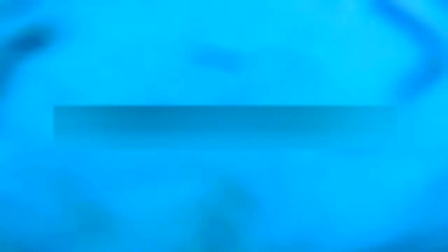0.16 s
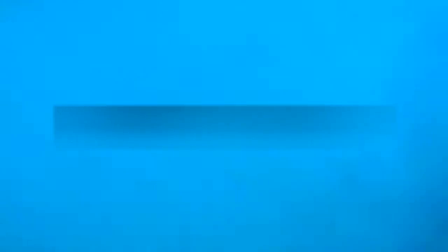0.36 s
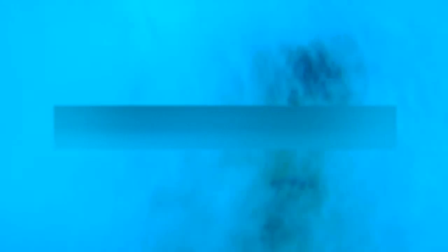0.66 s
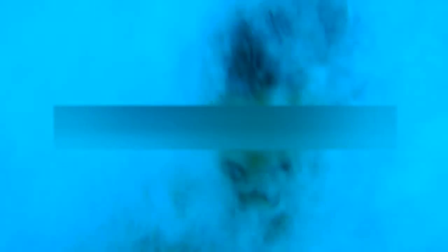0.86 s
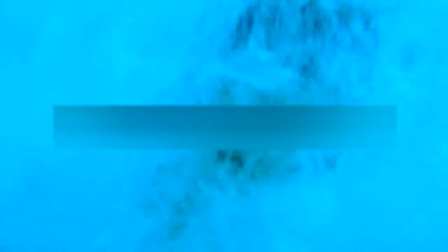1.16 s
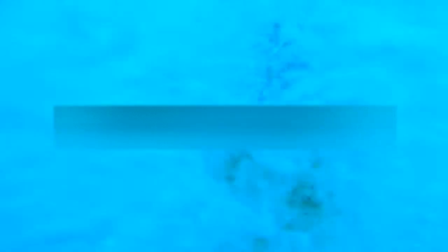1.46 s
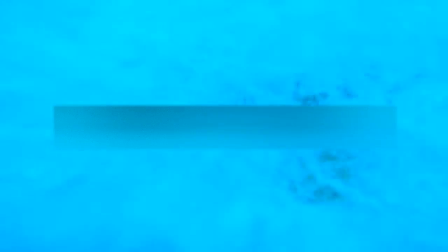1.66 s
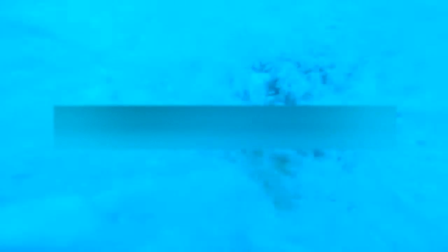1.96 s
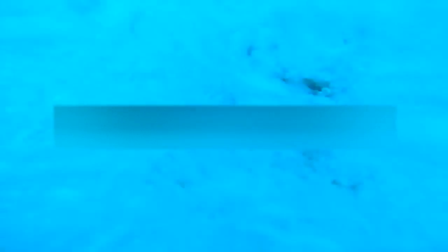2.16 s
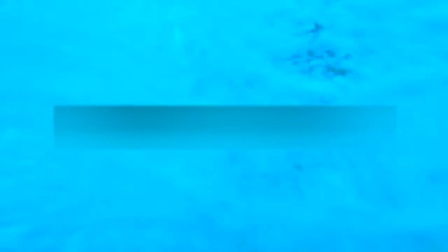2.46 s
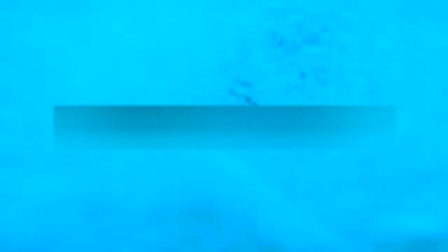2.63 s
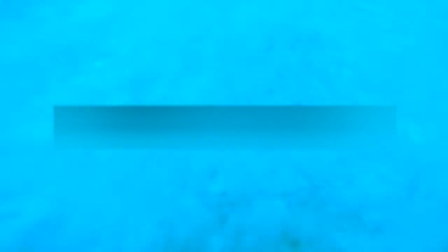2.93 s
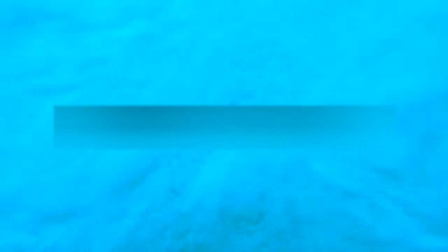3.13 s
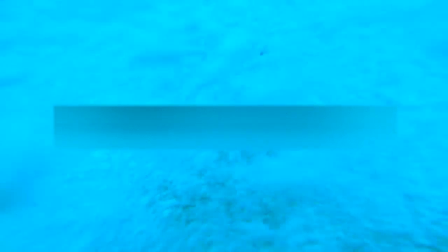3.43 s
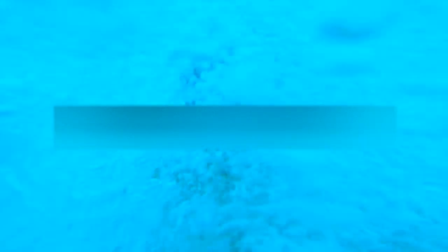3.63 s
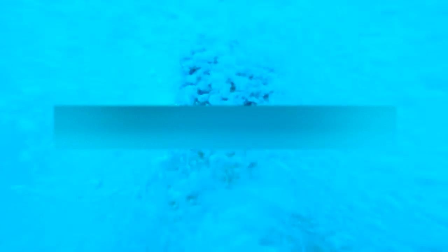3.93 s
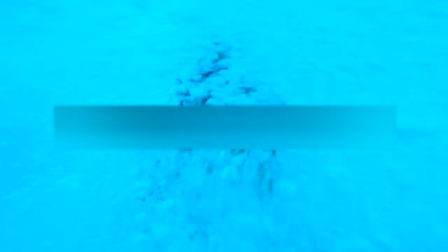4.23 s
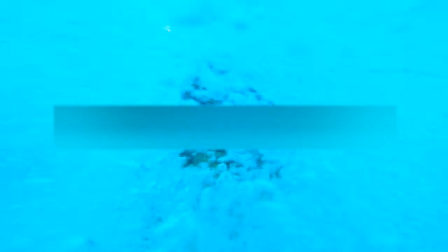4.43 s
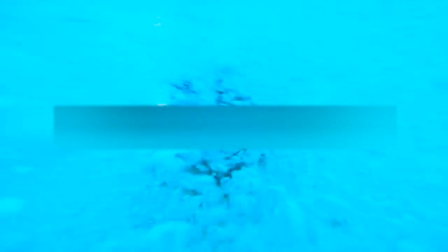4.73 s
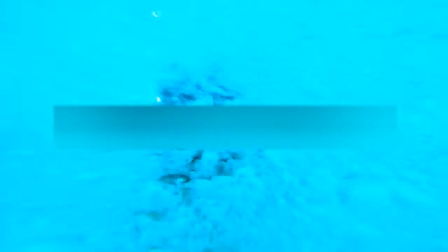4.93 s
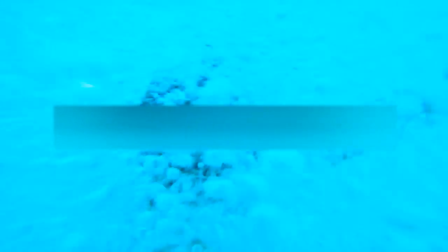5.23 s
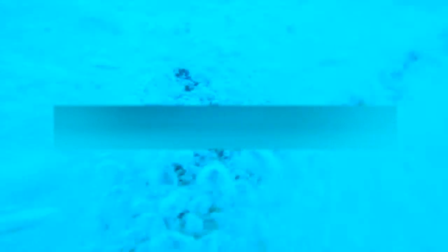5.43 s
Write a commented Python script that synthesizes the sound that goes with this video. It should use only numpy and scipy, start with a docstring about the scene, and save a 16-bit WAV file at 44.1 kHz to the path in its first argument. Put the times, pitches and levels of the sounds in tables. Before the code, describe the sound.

A rush of water and a burst of bubbles start at once, heard underwater from a camera in a sealed housing plunging into a pool. For the first second, dense gurgling mixes with fizz, sharp wet pops and tiny high plinks, with a light knock on the housing near 1 second. The fizz then thins, leaving rounded glugs over a low, buffeting rumble, with a strong shove of water near 2 seconds. From about 2.4 to 3 seconds, another knock opens a second bright flurry of pops and fizz. Trapped air gives one low, wavering hoot from roughly 2.7 to 3.2 seconds. Scattered pops and glugs follow, and the gurgling drops away around 4 seconds. The deep, muffled rush carries on with a few faint glugs until the end at about 5.6 seconds. The bubbles stay close and centred, while the water spreads slightly wider.

```python
"""A rush of water and a burst of bubbles: a camera in a sealed housing plunges into a pool.
Turbulence buffets the housing as it tumbles through the bubble cloud. Each bubble rings at a pitch
set by its size: large ones gurgle, small ones fizz and pop against the shell, and a few hard bursts
knock it. A trapped air pocket hoots once. When the cloud has passed, the muffled rush is left,
with a stray glug or two."""
import sys
import numpy as np
from scipy import signal
from scipy.fft import rfft, irfft, next_fast_len
from scipy.io import wavfile
from scipy.ndimage import uniform_filter1d

SR = 44100
rng = np.random.default_rng(int(sys.argv[2]) if len(sys.argv) > 2 else 0)


def master(y):
    """Save y as 16-bit WAV."""
    cut = np.clip(np.atleast_2d(y).T, -1, 1)
    pcm = np.round(cut * 32767)  # scale
    wavfile.write(sys.argv[1], SR, pcm.astype(np.int16))


N = 246519


def cloud():
    """Countless bubbles in three sizes; near ones come in clumps and stand out of the far blur."""
    # arc of the cloud: t/s, gurgle level/dB, fizz level/dB, spray level/dB, near share of power/0-1
    cloud_arc = [(0, -26.5, -29.5, -41.5, .8), (.08, -28, -25, -40, 0.68), (.19, -20, -21.5, -42.5, 0.9),
                 (.26, -17.5, -20.5, -59, 0.22), (.36, -20, -28, -55.5, 0.72),
                 (.5, -17.5, -25, -51.5, 0.46), (.61, -17.5, -27, -66, 0.12), (.78, -18, -34, -75, 0.03),
                 (.9, -24, -35, -56.5, 0.28), (.97, -20, -41, -72, 0), (1.1, -27, -47.5, -69, 0.67),
                 (1.46, -24.5, -53, -71, 0.36), (1.75, -24.5, -53, -69.5, .3),
                 (2.1, -23.5, -54.5, -67.5, 0.35), (2.38, -28, -51.5, -66, .4), (2.48, -21, -43, -64, 0.7),
                 (2.57, -25, -30.5, -44.5, 1), (2.61, -25, -24, -42, 0.99), (2.75, -24, -24, -41, 1),
                 (2.81, -27.5, -38.5, -57, 1), (2.93, -30, -35.5, -71, .7), (3.04, -30.5, -53.5, -75.5, .6),
                 (3.35, -30.5, -59, -76, 0.8), (3.88, -30.5, -60, -79, .6),
                 (3.97, -42.5, -56.5, -83.5, .75), (4.16, -51.5, -75, -80.5, 0.96),
                 (4.26, -51.5, -87, -99, 0.48), (5.45, -52.5, -90, -100, 0.51), (5.59, -46, -52, -99, 0.05)]
    # tone colours, each: f/Hz, relative level/dB
    gurgle_tone = [(250, 2.5), (400, 6), (600, 4.5), (800, -5), (1000, -14.5), (1400, -30), (2200, -51)]  # large bubbles
    fizz_tone = [(470, -33), (800, 3.5), (1070, -4.5), (1630, 2), (1780, 3), (2070, 1), (3250, -4),
                 (4260, -14.5), (5000, -40.5), (6500, -60), (11000, -120)]  # small bubbles, near
    murk_tone = [(530, -28), (900, -4), (1300, -11), (1590, -13.5), (1730, -19.5), (3920, -45), (5000, -42),
                 (6500, -72), (11000, -120)]  # small bubbles, far
    spray_tone = [(2650, -35), (4500, 4.5), (5220, -2), (6060, -2.5), (8550, -9), (9510, -11), (10900, -24),
                  (12600, -20.5), (15200, -19.5), (16000, -31.5)]  # finest bubbles, near
    mist_tone = [(2350, -29), (4000, 3), (8160, -4.5), (9280, -3), (11400, -6.5), (14800, -27),
                 (16000, -41)]  # finest bubbles, far
    gurgle_db, fizz_db, spray_db, near = curves(cloud_arc)
    far_gurgle, far_fizz, far_spray, fizz_drift, gurgle_drift = rng.standard_normal((5, N))
    thin_fizz_db = -61
    clump_db = np.clip(4.5 - 0.28 * (fizz_db - thin_fizz_db), 0, 8)  # denser fizz comes more evenly
    clumps = clumping(fizz_drift, clump_db)
    near_gurgle = unit_rms(swarm(249.8, 1685, per_s=2500, cycles=16.6, spread_db=3.0))
    near_fizz = coloured(swarm(800, 5000, per_s=1600, cycles=34, spread_db=2.5), fizz_tone)
    near_spray = coloured(swarm(4500, 15000, per_s=2700, cycles=24, spread_db=4.5), spray_tone)
    gurgle = coloured(0.63 * near_gurgle + far_gurgle, gurgle_tone) * clumping(gurgle_drift, depth_db=2)
    fizz = np.sqrt(near) * near_fizz * clumps + np.sqrt(1 - near) * coloured(far_fizz, murk_tone)
    spray = np.sqrt(near) * near_spray * clumps + np.sqrt(1 - near) * coloured(far_spray, mist_tone)
    return gain_of(gurgle_db) * gurgle + gain_of(fizz_db) * fizz + gain_of(spray_db) * spray


def glugs():
    """Single large bubbles ring low and round, bending upward as they die."""
    # large bubbles: t/s, level/dB, starting f/Hz, ring length/cycles
    glug_cues = [(.114, -4, 417, 14), (.18, -6.5, 662, 18), (.236, -13, 333, 27), (.29, 1.5, 385, 14),
                 (.446, -8, 416, 35), (0.568, 3, 480, 16.3), (0.62, -3, 277, 14), (.702, -5, 660, 45),
                 (.749, -10, 310, 34), (.796, 7.5, 571, 7.3), (.827, -10.5, 661, 59), (.957, -2, 567, 9),
                 (1.288, -12.5, 375, 36), (1.353, -5.5, 372, 14), (1.485, 0, 311, 10),
                 (1.567, -15.5, 354, 17), (1.654, -11, 365, 16), (1.752, -9.5, 393, 20),
                 (1.848, -4, 340, 23), (1.982, -14, 393, 19), (2.048, -11, 645, 46), (2.112, -4.5, 402, 29),
                 (2.262, -12, 920, 43), (2.358, -13.5, 358, 40), (2.48, -6.5, 400, 25),
                 (2.717, -10, 272, 32), (3.178, -5, 433, 17), (3.363, -7, 560, 25), (3.399, -9.5, 560, 18),
                 (3.423, -17, 650, 26), (3.611, -9.5, 385, 16), (3.834, -13.5, 513, 14),
                 (3.868, -13.5, 350, 24), (4.082, -10, 301, 26), (4.399, -21, 280, 21),
                 (5.324, -18, 378.4, 54)]
    out = np.zeros(N)
    for s, db, hz, cycles in glug_cues:
        add(out, s, gain_of(db) * bubble(hz, cycles / hz, rise=0.17, onset=0.85))
    return out


def pops():
    """A small bubble splits into two ringing parts with a wet splat, then sheds four fragments."""
    # bursts at the shell: t/s, level/dB, low f/Hz, high f/Hz, high part re low/dB, low part t60/ms
    pop_cues = [(0.028, -20.5, 1660, 2620, 6.5, 9), (0.07, -7.5, 1400, 2900, -20, 14),
                (0.0926, -2.5, 1450, 2540, -17, 7.5), (0.1111, -6.5, 1440, 2270, -8, 32),
                (0.283, -16.5, 1820, 2260, -16, 48), (0.3212, -13, 1570, 3490, -7, 29),
                (.4419, -15, 1440, 2280, -14, 28), (.4597, -15, 1430, 3630, 5, 8.5),
                (0.4888, 0, 1650, 2270, -5, 5.5), (.512, -11.5, 1480, 2500, 5, 11),
                (0.601, -14, 1320, 2470, -20, 17), (.645, -18, 1490, 2210, -7, 54),
                (0.717, -19, 1395, 2330, -9, 28), (.795, -21, 1570, 2200, 2.5, 14),
                (0.8363, -19, 1280, 2250, -16, 26), (0.865, -23, 1690, 2640, 1, 17),
                (0.8878, -12, 1300, 2410, -21, 9), (0.9104, -6.5, 2100, 2280, -17, 4.8),
                (0.9286, -15, 1250, 2200, -1, 16), (0.9592, -9, 1600, 2570, 7, 18.6),
                (1.0067, -17, 1940, 2430, -4, 10), (1.0645, -31, 1250, 2350, 1, 16),
                (1.0922, -31, 1690, 2440, 1.5, 20), (1.1163, -25, 1690, 2470, -3, 33),
                (1.137, -25, 1645, 2580, -21, 35), (1.172, -25, 1660, 2600, -22.5, 25),
                (1.18, -30.5, 1660, 2540, 5, 25), (1.257, -22.5, 1270, 2660, -5, 5.8),
                (1.3114, -27, 1660, 2320, -9, 21), (1.329, -18.5, 1400, 3020, -3, 23),
                (1.37, -22.5, 1590, 2340, 8, 4.3), (1.39, -33.5, 1400, 2230, 6, 15),
                (1.4418, -24, 1465, 2200, -5.5, 27), (1.6373, -29, 1590, 2380, -4.5, 25),
                (1.6784, -34, 1470, 2390, -9.5, 42), (1.7093, -40.5, 1340, 2310, 4.5, 37),
                (1.7847, -36.5, 1360, 3520, -3.5, 28), (1.976, -30, 1250, 2200, -8, 20),
                (2.138, -34, 1620, 2300, -28, 110), (2.266, -32.5, 1310, 2460, -18, 77),
                (2.3286, -27, 1500, 2400, -3, 43), (2.3868, -20, 2070, 2200, 1, 14),
                (2.4035, -10.5, 1270, 2450, -27, 27), (2.443, -24.5, 1230, 3900, 0.5, 15),
                (2.4604, -16.5, 1760, 2970, 4.5, 14), (2.479, -10.5, 1490, 2360, -5, 14),
                (2.486, -15.5, 1290, 2540, 4, 9.9), (2.514, -13, 2200, 2960, 3.5, 15),
                (2.528, -20, 1750, 2370, 12, 13), (2.546, -6.5, 1562, 2840, 6.5, 12.6),
                (2.554, -12, 1865, 2450, -4, 29), (2.5718, -8, 2120, 3480, 5, 7.8),
                (2.58, -20.5, 1670, 3185, 17, 17), (2.605, -20, 2122, 2350, -2, 22),
                (2.619, -18.5, 1625, 4130, 13.5, 9.2), (2.6329, -9, 2100, 2240, 1.5, 14),
                (2.667, -0.5, 1680, 3230, 0, 8.7), (2.685, -10.5, 1695, 2500, 0.5, 19),
                (2.7, -4.5, 1323, 3140, 5.5, 5.2), (2.7185, -7.5, 1440, 2410, 1.5, 23),
                (2.7445, -8.5, 2170, 2260, -9, 12), (2.7765, -18, 2010, 3200, 15, 4.3),
                (2.806, -12.5, 1590, 2430, -6, 8.3), (2.8594, -12, 1400, 2330, -8, 15),
                (2.898, -25, 1730, 3070, 8, 9), (2.9306, -7, 1490, 2590, -1, 9),
                (2.9819, -15, 1470, 2260, -13, 12), (3.006, -16.5, 1500, 2520, -11, 9.5),
                (3.0393, -31, 1260, 2260, -1, 10), (3.1195, -22, 1720, 2390, 8.5, 17.3),
                (3.155, -33, 1640, 2650, -7.5, 16.7), (3.206, -38.5, 1940, 2400, -8, 23),
                (3.27, -33, 2100, 2200, -12, 33), (3.309, -35, 1580, 2220, -6, 22),
                (3.3596, -23.5, 1300, 2430, -12, 13), (3.4934, -34, 1270, 3730, -2, 14),
                (3.5632, -26.5, 1500, 3140, -17, 40), (3.6014, -23.5, 1650, 4470, -2, 17),
                (3.689, -32, 1580, 2680, -12, 47), (3.706, -29.5, 1720, 3040, -10, 22),
                (3.7926, -37.5, 2090, 2200, -3, 31), (3.8387, -40, 1530, 2820, -1, 35),
                (3.8755, -29, 1720, 4180, -1, 17), (3.9137, -39, 1280, 4070, 14.5, 15),
                (3.9216, -29, 1870, 3220, 13, 22.5)]
    splat_db, shed_db, shed_window_s = -4, -2, 0.016
    out, t = np.zeros(N), np.arange(1200) / SR
    splat_band = signal.butter(5, [1200, 3700], "bandpass", fs=SR, output="sos")
    splat_shape = strike(t, attack_s=0.0004, t60=0.026)
    sheds = rng.random((len(pop_cues), 4, 3))
    noises = rng.standard_normal((len(pop_cues), len(t)))
    for (s, db, low_hz, high_hz, high_db, ring_ms), fragments, noise in zip(pop_cues, sheds, noises):
        t60 = ring_ms / 1e3
        add(out, s, gain_of(db) * bubble(low_hz, t60, rise=0.04))
        add(out, s, gain_of(db + high_db) * bubble(high_hz, 0.79 * t60, rise=0.043))
        add(out, s, gain_of(db + splat_db) * signal.sosfilt(splat_band, noise * splat_shape))
        for late, faint, pitch in fragments:
            hz = 1000 * 3.8 ** pitch
            fragment_db = db + shed_db - 18 * faint - 6 * pitch
            add(out, s + shed_window_s * late, gain_of(fragment_db) * bubble(hz, 30 / hz, rise=0.039))
    return out


def plinks():
    """The tiniest bubbles add sparkle: a short high ring and a spit of noise."""
    # tiny bubbles: t/s, level/dB, f/Hz, spit re ring/dB
    plink_cues = [(0.0895, -19, 5650, -12), (0.176, -22, 4770, -6), (0.2, -23, 6800, -17),
                  (0.3213, -24.5, 5200, -9.5), (0.405, -28.5, 4800, 2.5), (0.4564, -24.5, 9000, -5),
                  (0.4744, -12, 8230, -12.5), (0.5003, -22, 4700, -8), (0.5608, -31.5, 5640, 2),
                  (0.622, -27, 5710, -18), (0.6457, -33, 5160, -6), (0.7967, -39, 4730, -6),
                  (0.8287, -26, 5800, -11), (0.877, -28, 6200, -14), (0.8894, -25, 6050, -6),
                  (0.9208, -24.5, 9390, -9), (0.9577, -25, 4800, -6), (1.0076, -21, 6610, -17.5),
                  (1.2623, -43.5, 5660, 11.5), (2.4062, -9.5, 6440, -17), (2.4428, -23, 12400, -18.5),
                  (2.46, -12.5, 6530, -5), (2.4937, -20, 4960, -11), (2.5556, -7.5, 5970, -19.5),
                  (2.5835, -11.5, 9290, -9), (2.614, -25, 4640, -2), (2.6569, -25.5, 5960, -16.5),
                  (2.69, -14.5, 4660, -14), (2.7097, -17.5, 4930, -5), (2.7437, -19, 5860, -6.5),
                  (2.831, -28.5, 8050, -12), (2.8613, -15, 5470, -29), (2.9308, -28, 5570, -3),
                  (2.9823, -34, 6740, -15), (3.0072, -34, 5630, -1.5), (3.1272, -27.5, 4946, -25),
                  (3.146, -33.5, 8300, -12), (3.6015, -16.5, 4820, -22.5), (3.7934, -45, 4630, 2.5),
                  (3.8746, -53, 4750, -15), (3.913, -46, 4700, -10), (3.9384, -38, 6300, -15)]
    out, t = np.zeros(N), np.arange(600) / SR
    spit_band = signal.butter(2, [4500, 12500], "bandpass", fs=SR)
    spit_shape = strike(t, attack_s=0.0003, t60=0.013)
    for s, db, hz, spit_db in plink_cues:
        spit = signal.lfilter(*spit_band, rng.standard_normal(len(t)) * spit_shape)
        add(out, s, gain_of(db) * bubble(hz, 45 / hz, rise=0.016, onset=2.0))
        add(out, s, gain_of(db + spit_db) * spit)
    return out


def air_pocket():
    """Trapped air gives one nearly pure hoot whose pitch follows the size of the pocket."""
    # contour of the hoot: t/s, f/Hz, level/dB
    hoot_arc = [(2.74, 141.1, -42), (2.778, 157.3, -7.5), (2.814, 160.2, -11.5), (2.915, 114.6, -10),
                (2.947, 119.6, -13.5), (2.989, 147, -12.5), (3.034, 163.4, -21), (3.114, 151.7, -16),
                (3.16, 134, -23), (3.201, 130, -17.5)]
    hz, db = curves(hoot_arc)
    start_s, end_s, fade_s = hoot_arc[0][0], hoot_arc[-1][0], 0.072
    t = np.arange(N) / SR
    phase = 2 * np.pi * np.cumsum(hz) / SR
    fade = np.clip(np.minimum(t - start_s, end_s - t) / fade_s, 0, 1)
    return np.sqrt(2) * fade * gain_of(db) * (np.sin(phase) + 0.12 * np.sin(2 * phase))


def knocks():
    """Hard bursts make the housing itself ring, each mode at a steady pitch."""
    # hits on the housing: t/s, level/dB
    knock_cues = [(0.9595, -17.5), (1.3294, -33), (2.4062, -16.5)]
    # low modes of the housing: f/Hz, level re hit/dB, t60/s
    shell_modes = [(1095, 16, 0.016), (871, 4.5, 0.04), (1720, -1, 0.034)]
    out = np.zeros(N)
    for s, db in knock_cues:
        for hz, mode_db, t60 in shell_modes:
            add(out, s, gain_of(db + mode_db) * bubble(hz, t60, rise=0, onset=0.7))
    return out


def water_rush():
    """The stereo bed of turbulence on the housing: slow buffeting below, a smoother rush above."""
    # arc of the flow: t/s, buffeting level/dB, rush level/dB
    flow_arc = [(0.0, -15.5, -24), (0.15, -21.5, -21.5), (0.47, -20.5, -18), (0.95, -16, -18.5),
                (1.43, -14, -20.5), (1.62, -14, -19.5), (1.76, -14.5, -19), (2.19, -12, -16.5),
                (2.65, -14, -20), (2.83, -16.5, -22), (2.96, -19, -23), (3.33, -17.5, -20),
                (4.19, -15.5, -24.5), (4.64, -17.5, -23), (4.87, -17, -25.5), (5.11, -16.5, -26),
                (5.29, -17, -22.5), (5.59, -18.5, -24.5)]
    # brief shoves of water: t/s, change in buffeting level/dB
    shoves = [(0.17, 6.5), (0.39, 7.5), (0.72, 2.5), (1.1, -3), (1.48, 3), (1.871, 4), (1.961, 12),
              (2.54, 0), (3.67, 1.5), (4.13, 3)]
    # tone colours, each: f/Hz, relative level/dB
    flow_tone = [(11, -23.5), (18, 1), (28, -11), (44, -8.5), (96, -10.5), (144, -15), (216, -18),
                 (318, -22.5), (371, -25.5), (458, -33.5), (577, -40.5), (661, -76.5), (1270, -78.5),
                 (1800, -110), (2340, -140), (3960, -120)]  # buffeting and rush together
    eddy_tone = [(8.8, -26), (15, 0.5), (106, -2), (174, 0), (319, -3.5), (502, -11), (668, -26.5),
                 (855, -43.5), (1400, -55.5), (1820, -75.5), (3080, -120)]  # eddies, unlike at the two microphone ports
    shove_s, crossover_hz = 0.034, 90
    t = np.arange(N) / SR
    buffet_db, rush_db = curves(flow_arc)
    buffet_db += sum(db * np.exp(-((t - s) / shove_s) ** 2) for s, db in shoves)
    flow = coloured(rng.standard_normal(N), flow_tone)
    lows = signal.sosfiltfilt(signal.butter(3, crossover_hz, fs=SR, output="sos"), flow)
    buffet = lows / np.sqrt(uniform_filter1d(lows ** 2, 4000) + 0.072)  # the shell flexes only so far
    eddy_db = -33.5 + 0.76 * (rush_db + 22.5)  # eddies swell with the rush
    eddies = gain_of(eddy_db) * coloured(rng.standard_normal(N), eddy_tone)
    centre = gain_of(buffet_db) * unit_rms(buffet) + gain_of(rush_db) * unit_rms(flow - lows)
    return centre * gain_of([[0.3], [-0.3]]) + np.outer([1, -1], eddies)


def bubble(hz, t60, rise, onset=1.1):
    """A dying sine that swells in over onset cycles; rise bends it upward as the bubble shrinks."""
    t = np.arange(round(t60 * SR) + 8) / SR
    swell = 1 - np.exp(-(t * hz / onset) ** 2)
    phase = 2 * np.pi * hz * t * (1 + rise * t / t60)
    return swell * gain_of(-60 * t / t60) * np.sin(phase)


def swarm(low_hz, high_hz, per_s, cycles, spread_db, sizes=24):
    """Bubbles of many sizes at random moments, a few much louder; equal energy per Hz."""
    out = np.zeros(N)
    for hz in np.geomspace(low_hz, high_hz, sizes):
        strength = gain_of(spread_db * np.minimum(rng.exponential(1, N), 5))
        births = rng.random(N) < per_s / sizes / SR
        kicks = strength * births * rng.choice([-1, 1], N)
        out += hz * signal.oaconvolve(kicks, bubble(hz, cycles / hz, rise=0.37))[:N]
    return out


def clumping(noise, depth_db):
    """A gain that wanders over some tens of milliseconds, its mean power 1."""
    wander = unit_rms(uniform_filter1d(uniform_filter1d(noise, 400), 400))
    return gain_of(depth_db * wander - depth_db ** 2 * np.log(10) / 20)


def strike(t, attack_s, t60):
    """A percussive envelope: quick attack, exponential tail."""
    return gain_of(-60 * t / t60) * (1 - np.exp(-t / attack_s))


def coloured(x, tone):
    """Equalises a signal with a tone colour and sets its rms to 1."""
    size = next_fast_len(N)
    bin_hz = np.fft.rfftfreq(size, 1 / SR)
    hz, db = np.transpose(tone)
    bin_db = np.interp(np.log(bin_hz + 1), np.log(hz + 1), db, left=-120, right=-120)
    return unit_rms(irfft(rfft(x, size) * gain_of(bin_db), size)[:N])


def curves(rows):
    """One automation curve for each column after the time."""
    s, *columns = np.transpose(rows)
    return [np.interp(np.arange(N) / SR, s, column) for column in columns]


def add(mix, s, sound):
    """Drops a sound into the mix at s seconds."""
    part = mix[round(s * SR):][:len(sound)]
    part += sound[:len(part)]


def gain_of(db):
    """Decibels to amplitude."""
    return 10 ** (np.asarray(db) / 20)


def unit_rms(x):
    """Scales a signal to rms 1."""
    return x / np.sqrt(np.mean(x ** 2) + 1e-20)


def scene():
    """The stereo water bed, with bubbles, knocks and hoot in the centre."""
    return water_rush() + cloud() + pops() + plinks() + glugs() + knocks() + air_pocket()


def record(dry):
    """The camera's audio chain: faint preamp hiss, overload with a rounded knee, band limit."""
    hiss_db, cutoff_hz = -102, 15800
    hissy = dry + gain_of(hiss_db) * rng.standard_normal(dry.shape)
    saturated = 1.04 * hissy / (1 + abs(hissy) ** 6) ** (1 / 6)
    lowpass = signal.firwin(511, cutoff_hz, window=("kaiser", 9), fs=SR)
    return np.clip(signal.oaconvolve(saturated, lowpass[None], "same"), -1, 1)


dry = scene()
out = record(dry)
master(out)
```